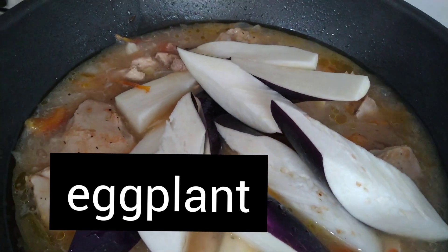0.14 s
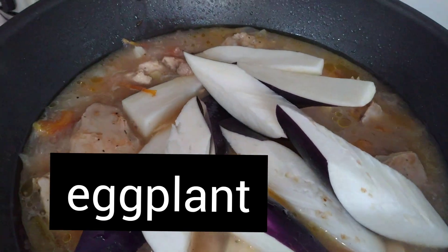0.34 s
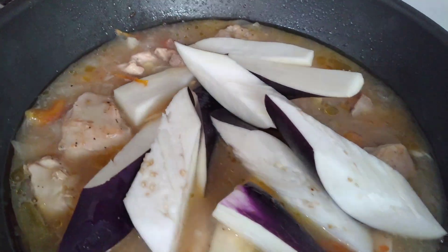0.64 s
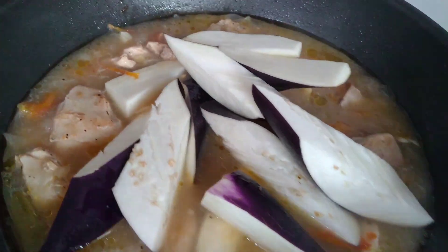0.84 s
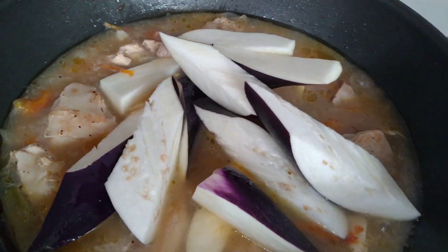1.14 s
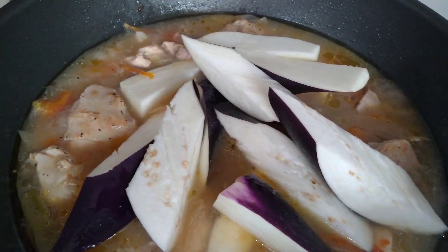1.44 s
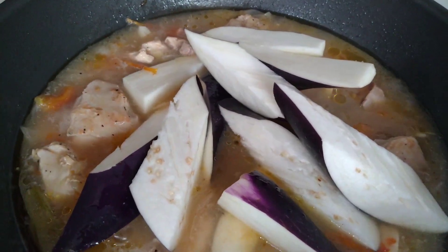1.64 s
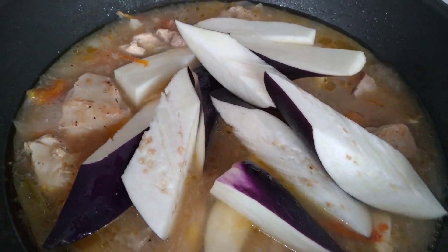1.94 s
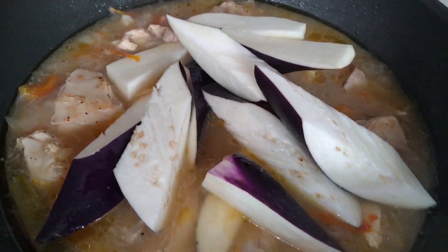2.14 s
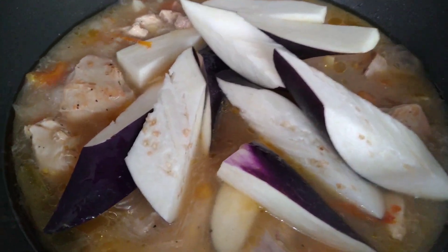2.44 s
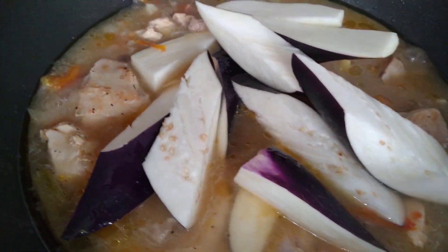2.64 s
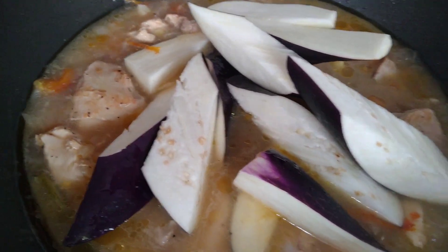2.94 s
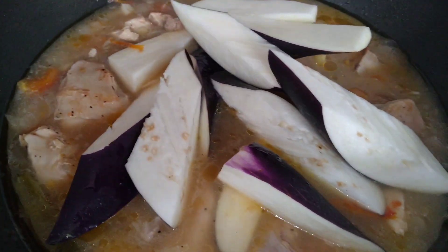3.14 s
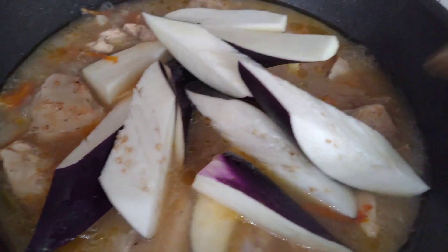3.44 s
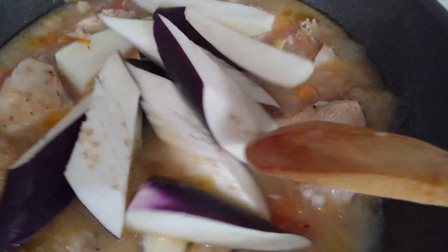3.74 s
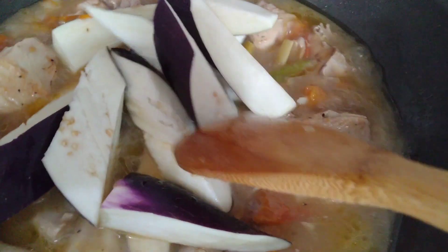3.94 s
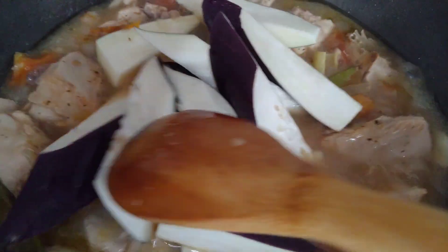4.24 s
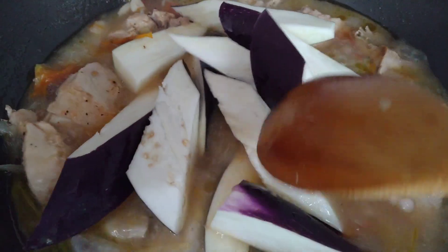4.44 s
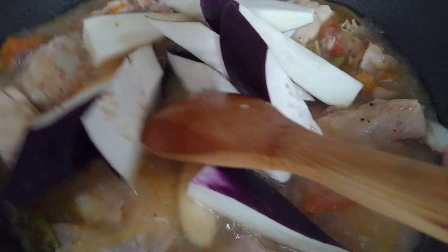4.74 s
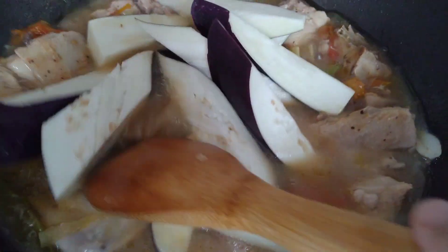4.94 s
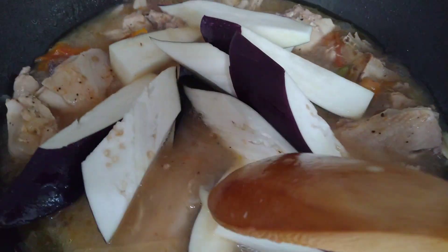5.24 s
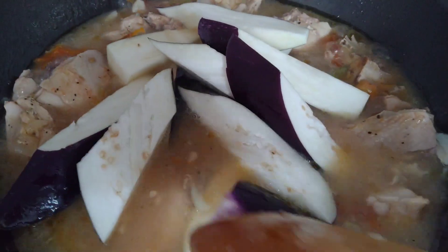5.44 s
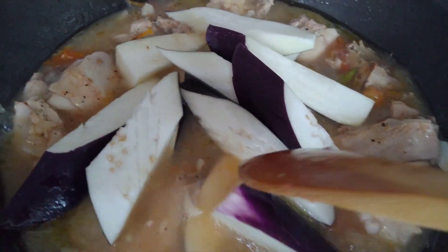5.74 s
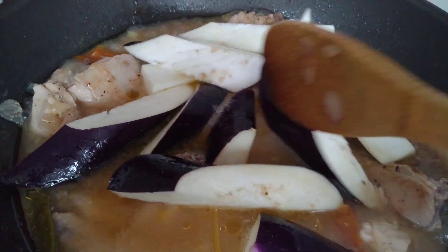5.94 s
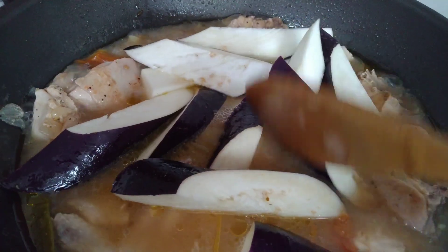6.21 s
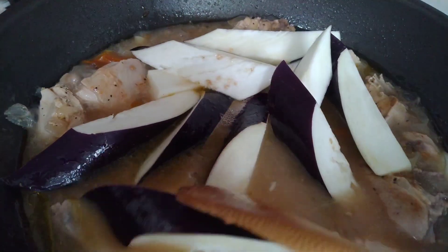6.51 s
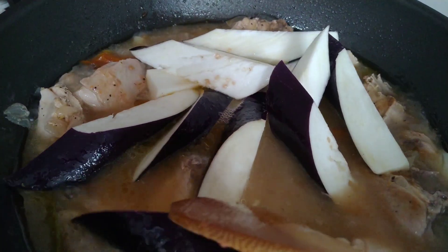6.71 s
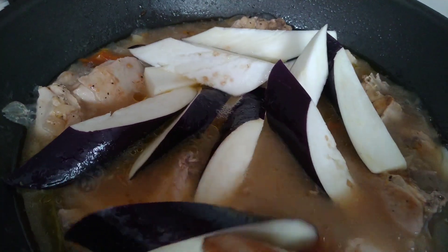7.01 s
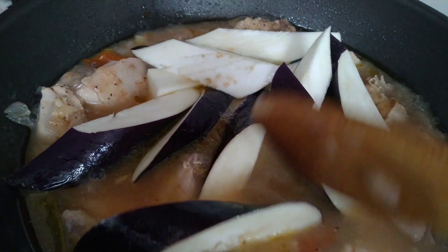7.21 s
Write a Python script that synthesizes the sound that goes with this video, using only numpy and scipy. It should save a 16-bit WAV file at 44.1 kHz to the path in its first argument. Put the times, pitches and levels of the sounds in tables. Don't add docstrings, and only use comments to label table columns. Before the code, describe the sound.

A phone held close to a simmering pan hears a low, slowly beating burner hum near 100 Hz, a soft boiling wash and thin hiss. From 0 to 1.6 s rounded bubbles pop irregularly, mostly around 1 kHz. At 1.77 s a wooden tool knocks loudly on a steel counter further off, bouncing twice within 0.06 s and ringing into a hard kitchen; a softer, duller knock follows at 2.08 s. Hand-held cutlery clinks briefly at 2.53-2.62 s. Bubbles resume, with faint wet rubs from 3.2 s. From 3.6 s a spatula stirs: short moist scrapes, higher squelchy pops, more fizz, a sharp spit at 5.06 s. At 5.76 s sound drops out for about 0.06 s, then quickly fades in. The simmer is now stronger, surging around 6.1-6.4 s with the heaviest scrape, clustered pops and crackling spits, easing slightly until 7.4 s.

```python
import sys
import numpy as np
from scipy import signal
from scipy.io import wavfile
from scipy.ndimage import uniform_filter1d

SR = 44100
rng = np.random.default_rng(int(sys.argv[2]) if len(sys.argv) > 2 else 0)


def unload_wav(signal):
    wavfile.write(
        sys.argv[1],
        SR,
        np.round(np.clip(np.atleast_2d(signal).T, -1, 1) * 32767).astype(np.int16),
    )


def field_ratio(decibels):
    return 10 ** (np.asarray(decibels, dtype=float) / 20)


N = 325017

# [t/s, level/dB]
SIMMER = [(0, -4), (1.7, -2), (2.3, -1.5), (3.2, -1.5), (4.4, -0.5), (5.7, -0.5), (5.9, 1), (6.05, 5),
          (6.2, 5.5), (6.4, 4), (6.7, 3.5), (7.37, 2.2)]


def evened(x):
    return x / np.sqrt(np.mean(x ** 2) + 1e-20)


def read(points, hz):
    f, value = np.transpose(points)
    return np.interp(np.log(hz + 1), np.log(f + 1), value)


def curves(rows):
    s, *columns = np.transpose(rows)
    return [np.interp(np.arange(N) / SR, s, c) for c in columns]


def add(mix, s, sound):
    part = mix[round(s * SR):][:len(sound)]
    part += sound[:len(part)]


def resonate(x, hz, width_hz):
    r = np.exp(-np.pi * width_hz / SR)
    return 2 * signal.lfilter([1 - r], [1, -r * np.exp(2j * np.pi * hz / SR)], x).real


def resonate_twice(x, hz, width_hz):
    return resonate(resonate(x, hz, width_hz), hz, width_hz)


def coloured(x, points):
    log_gain = np.log(field_ratio(read(points, abs(np.fft.fftfreq(4096, 1 / SR)))))
    taps = np.fft.ifft(np.exp(np.conj(signal.hilbert(log_gain)))).real[:2048]
    return signal.oaconvolve(x, taps / np.linalg.norm(taps))[:len(x)]


def wash(points, patchy_db, flicker_db):
    frames, hz = N // 256 + 5, np.fft.rfftfreq(1024, 1 / SR)
    a, b, patches = rng.standard_normal((frames, 513, 3)).T
    patches = uniform_filter1d(patches, size=14, axis=0)
    patches = evened(uniform_filter1d(patches, size=10, axis=1))
    flicker = evened(uniform_filter1d(rng.standard_normal(frames), size=5))
    level_db = read(points, hz)[:, None] + patchy_db * patches + flicker_db * flicker
    z = (a + 1j * b) * field_ratio(level_db)
    return evened(signal.istft(z, nperseg=1024, noverlap=768)[1][:N])


def hum():
    # [t/s, hum/dB, extra flutter/dB]
    load = [(0, -1, 1), (.7, -2, 4), (1.4, -1, -1), (2.1, 0, 2), (3, -1, 0), (4, 0, 2), (4.4, 0.5, -2),
            (4.75, -2, -4), (5.2, 0.5, 0), (5.7, -2.5, 6), (5.9, 3, 2), (6.3, 2, -2), (6.8, 2.5, 0),
            (7.37, 2.5, -5)]
    # [t/s, level/dB]
    near_share = [(0, -14), (1.3, -13), (2, -5), (2.5, -3), (3.6, -2.5), (5, -7), (5.6, -17), (7.37, -18)]
    hum_hz, hum_db, flutter_db, far_db = 104.47, -51.3, -10, -11
    t = np.arange(N) / SR
    near = np.exp(-2j * np.pi * 1.73 * (t - 3.416))
    far = np.exp(-2j * np.pi * 6.92 * (t - 3.461))
    beats = 1 + field_ratio(curves(near_share)[0]) * near + field_ratio(far_db) * far
    tone = np.sqrt(2) * (beats * np.exp(2j * np.pi * hum_hz * t)).imag
    flutter = evened(resonate_twice(rng.standard_normal(N), hum_hz, 40.0))
    load_db, loose_db = curves(load)
    return field_ratio(hum_db + load_db) * (tone + field_ratio(flutter_db + loose_db) * flutter)


def burner():
    # [f/Hz, width/Hz, level/dB]
    steady = [(132.2, 18.5, -63.5), (181.8, 15, -69), (300.8, 11, -71), (337.2, 10.5, -71)]
    # [t/s, length/s, f/Hz, level/dB]
    singing = [(.2, 0.23, 1864, -66.5), (.85, 0.38, 1600, -72), (2.95, .25, 1700, -73),
               (3.53, 0.23, 1850, -67.5), (5.8, 0.23, 1850, -59.5), (6.45, 0.34, 1940, -76),
               (7.12, 0.23, 1850, -64), (.05, 0.36, 2176, -71.5), (.78, 0.22, 2200, -69),
               (4.84, 0.22, 2176, -70.5), (5.08, 0.13, 2176, -67), (2.38, .14, 790, -63),
               (1., 0.28, 2900, -75), (3.75, 0.25, 2400, -77), (3, 0.23, 3000, -77),
               (4.41, 0.042, 5500, -61.5)]
    # [f/Hz, density/dB per Hz]
    body_spectrum = [(15, -60), (25, -31), (44, -29), (72, -9), (108, -5), (154, -5), (235, -12),
                     (320, -11.5), (446, -14), (510, -14.5), (1840, -22.5), (3350, -27), (4100, -43),
                     (5000, -42.5), (6500, -71), (11000, -120)]
    # [f/Hz, density/dB per Hz]
    hiss_spectrum = [(2060, -29), (3500, -2.5), (4210, -10.5), (4630, -4.5), (6700, -9), (7410, -2.5),
                     (8310, -2.5), (9200, -8), (10300, -11), (12200, -11.5), (15100, -4), (16000, -10)]
    noise = rng.standard_normal(N)
    out = hum()
    for hz, width_hz, db in steady + [(2769, 8, -88)]:
        out += field_ratio(db) * evened(resonate_twice(noise, hz, width_hz))
    for s, length_s, hz, db in singing:
        size = round(length_s * SR)
        tone = 0.77 * np.sin(2 * np.pi * hz * np.arange(size) / SR)
        add(out, s, field_ratio(db) * signal.windows.tukey(size, .6) * tone)
    vigour_db = curves(SIMMER)[0]
    body = field_ratio(-58 + vigour_db) * wash(body_spectrum, 1.93, 0.63)
    hiss = field_ratio(-71 + 0.98 * vigour_db) * wash(hiss_spectrum, 0.99, 0.76)
    return out + body + hiss


def stirring(s):
    start_s, rise_s = 3.6, .3
    return np.clip((s - start_s) / rise_s, 0, 1)


def bubble(hz, cycles, rise):
    opening_cycles = 0.52
    turns = np.arange(3000) / SR * hz
    shape = (1 - np.exp(-turns / opening_cycles)) ** 2 * np.exp(-turns / max(cycles, .3))
    pop = shape / shape.max() * np.sin(2 * np.pi * (turns + rise * turns ** 2))
    pop[118:] += 0.18 * pop[:-118].copy()
    return pop


def tick(hz, t60, width_hz):
    t, hz = np.arange(3000) / SR, min(hz, 15500)
    burst = evened(resonate_twice(rng.standard_normal(len(t)), hz, width_hz))
    decay = field_ratio(-60 * t / t60) + 0.093 * field_ratio(-60 * t / (8.0 * t60))
    return burst * (1 - np.exp(-t / 0.00014)) * decay


def bubbles():
    # [t/s, peak/dB, f/Hz, ring/cycles]
    clear = [(0.195, -35, 1180, 1.7), (0.241, -52, 1300, 2), (0.313, -46, 910, 1.1),
             (0.411, -45.5, 840, 1.5), (0.597, -46, 1340, 1.4), (0.62, -36.5, 1020, 1.2),
             (0.698, -36.5, 1410, 1.1), (0.731, -45, 960, 1.7), (0.79, -43, 1400, 2.2),
             (0.907, -39.5, 1240, 1.8), (0.972, -43, 940, 1.2), (0.984, -42, 990, 1.2),
             (1.105, -45, 910, 1.4), (1.131, -42.5, 740, 1.6), (1.2725, -39.5, 890, 0.73),
             (1.277, -40, 1210, 0.66), (1.2835, -33.5, 990, 1.8), (1.389, -37, 870, 2),
             (1.611, -37.5, 1230, 1.1), (2.5495, -32.5, 760, 0.83), (2.651, -42, 780, .9),
             (2.714, -37.5, 960, 0.83), (2.789, -42.5, 1420, 1.2), (2.875, -41.5, 920, .8),
             (2.921, -49, 800, .8), (3.163, -43, 990, 0.82), (3.1665, -35, 1300, 2),
             (3.268, -43.5, 810, 1.5), (3.322, -36, 1220, 1.4), (3.04, -47, 1050, 1.2),
             (3.397, -45, 1500, .8), (3.405, -38, 1190, 0.71), (3.442, -48, 1100, .8),
             (3.5415, -36, 1220, 1.3), (3.544, -33, 1360, 2.5), (3.59, -46, 1030, 1.5),
             (3.607, -45, 925, 1.4), (3.66, -49, 845, 1.2), (3.71, -46.5, 900, 1.5)]
    # [t/s, peak/dB, f/Hz]
    stirred_pops = [(3.889, -44.5, 564), (4.265, -41, 520), (4.426, -42.5, 665), (4.497, -43, 690),
                    (4.726, -43, 500), (4.767, -43.5, 553), (5.546, -47.5, 760), (5.818, -58, 467),
                    (6.115, -45, 630), (6.487, -53, 500), (6.555, -45, 550), (6.727, -44, 540),
                    (3.947, -48.5, 1600), (3.975, -54, 2500), (4.085, -47, 1080), (4.345, -47.5, 900),
                 (4.61, -48, 1450), (4.858, -50.5, 2450), (5.06, -52, 3050), (5.075, -48, 2000),
                 (5.35, -54, 2900), (5.46, -50, 1800), (6.49, -45, 2500), (6.61, -44, 1990),
                 (4.265, -47.5, 1070), (4.405, -43, 1560), (4.423, -45, 1880), (4.496, -43, 1460),
                 (4.709, -45, 1770), (4.726, -40, 1120), (4.77, -42, 1500), (5.098, -43, 2970),
                 (5.316, -44.5, 1410), (5.334, -41.5, 1600), (5.547, -44, 1410), (5.554, -41.5, 1380),
                 (5.628, -39, 1290), (5.65, -44, 1650), (5.899, -42, 1610), (5.909, -39, 1920),
                 (6.016, -45, 1690), (6.129, -38, 2040), (6.199, -38, 1340), (6.213, -32.5, 1680),
                 (6.302, -37.5, 1350), (6.313, -31, 1430), (6.555, -37, 1370), (6.649, -43, 1910),
                 (6.728, -43.5, 2150), (7.085, -40, 1860), (7.127, -42.5, 1140), (7.313, -41, 2500),
                 (7.327, -41.5, 1440)]
    stirred_ring_cycles, splash_db, stirred_splash_db = 1.3, -18, 8
    out = np.zeros(N)
    for s, db, hz, ring in clear + [row + (stirred_ring_cycles,) for row in stirred_pops]:
        pop = bubble(hz, ring, rise=0.0041)
        pop += 0.12 * bubble(1.56 * hz, 2.1, rise=.01)
        pop += 0.34 * bubble(0.604 * hz, 0.94, rise=0.013)
        splash = field_ratio(splash_db + stirred_splash_db * stirring(s)) * tick(hz, 0.059, width_hz=910)
        add(out, s, field_ratio(db - 3.0) * (pop + splash))
    for hz in np.geomspace(450, 1900, num=14):
        level_db = -61.0 + 1.1 * np.minimum(rng.exponential(size=N), 2)
        train = (rng.random(N) < 3.5 / SR) * field_ratio(level_db)
        out += signal.oaconvolve(train, bubble(hz, 0.95, rise=0.025))[:N]
    for hz in np.geomspace(1050, 2300, num=7):
        train = (rng.random(N) < .8 / SR) * field_ratio(-60) * stirring(np.arange(N) / SR)
        pop = bubble(hz, 1.4, rise=0.01) + 0.37 * tick(hz, 0.069, width_hz=630)
        out += signal.oaconvolve(train, pop)[:N]
    return out


def ticks():
    # [t/s, peak/dB]
    clear = [(2.282, -55), (3.864, -56), (3.918, -48.5), (3.98, -56), (4.052, -55), (4.269, -55.5),
             (4.405, -56.5), (4.63, -57), (4.763, -51), (4.935, -51), (4.968, -52), (5.058, -35),
             (5.295, -56), (5.321, -52), (5.494, -54), (5.607, -56), (5.632, -49), (5.688, -52),
             (5.705, -56), (6.046, -53), (6.217, -55), (6.346, -44), (6.38, -48), (6.428, -51),
             (6.861, -50), (7.243, -47), (7.297, -52)]
    # [t/s, peak/dB, f/Hz]
    wet_smacks = [(2.851, -58, 12700), (3.845, -51, 3000), (4.18, -59, 5200), (4.244, -58, 11200),
                  (4.338, -60, 10000), (4.87, -59, 12300), (5.512, -56, 4500), (5.907, -53, 11600),
                  (6.05, -52, 3600), (6.085, -50, 3900), (6.73, -55, 3000), (6.65, -56, 4000),
                  (6.306, -51, 9600), (6.544, -55, 11700), (6.598, -49.5, 10700), (6.805, -53, 11300),
                  (6.954, -54, 10400), (6.3674, -54, 8160), (6.3974, -52, 8200), (6.6673, -49, 8830),
                  (6.8743, -50, 8300), (6.905, -53, 8500), (6.991, -53, 8570), (7.0733, -55.5, 7580),
                  (7.2, -60, 8520)]
    rim_hz, rim_spread = 15100, 0.022
    out, fizz = np.zeros(N), np.zeros(N)
    spits = [(s, db, rim_hz * (1 + rim_spread * rng.standard_normal())) for s, db in clear]
    for s, db, hz in spits + wet_smacks:
        add(out, s, field_ratio(db - 9.5) * tick(hz, 0.038, width_hz=3800))
    for hz in np.linspace(10500, 15500, num=8):
        rate_hz = 12. * (hz / 12000) ** 2
        train = (rng.random(N) < rate_hz / SR) * field_ratio(7.8 * np.minimum(rng.exponential(size=N), 3))
        fizz += signal.oaconvolve(train, tick(hz, 0.034, width_hz=3700))[:N]
    level_db = -88.5 + 1.3 * curves(SIMMER)[0] + 7.5 * stirring(np.arange(N) / SR)
    return out + field_ratio(level_db) * evened(fizz)


def rings(modes, spread_db=0.):
    t = np.arange(8000) / SR
    out = np.zeros(len(t))
    for hz, db, t60 in modes:
        level_db = db + spread_db * rng.standard_normal()
        out += field_ratio(level_db - 60 * t / t60) * np.sin(2 * np.pi * hz * t)
    return out


def knock(blows, colour, modes):
    # [t/s, share]
    touches = [
        (0, 0.018),
        (.0006, 1.),
        (.0014, -0.12),
        (.0021, 0.58),
        (.0031, -0.3),
    ]
    dry, feed, contacts = np.zeros(N), np.zeros(N), np.zeros(8000)
    for s, share in touches:
        contacts[round(s * SR)] = share
    crack = coloured(signal.unit_impulse(len(contacts)), colour)
    chatter = coloured(contacts, colour)
    ringing = field_ratio(7.0) * rings(modes)
    for s, dry_db, room_db, dull in blows:
        dull = np.clip(dull, 0, .95)
        for mix, db, blow in ((dry, dry_db, chatter), (feed, room_db, crack)):
            hit = blow / abs(blow).max() + ringing
            soft = signal.lfilter([1], [1, -2 * dull, dull ** 2], hit)
            add(mix, s, field_ratio(db) * soft / abs(soft).max())
    return signal.sosfilt(signal.butter(2, 201, "high", fs=SR, output="sos"), [dry, feed])


def counter(s, modes):
    out, t = np.zeros(N), np.arange(SR // 2) / SR
    ringing = np.zeros(len(t))
    for hz, db, t60 in modes:
        ringing += field_ratio(db - 60 * t / t60) * np.sin(2 * np.pi * (hz * t + rng.random()))
    add(out, s, (1 - np.exp(-t / 0.0079)) * ringing)
    return out


def kitchen(x, damping):
    # [f/Hz, t60/s]
    decay = [(250, 0.39), (660, 0.47), (1740, 0.37), (4590, 0.4), (8000, 0.34), (16000, 0.35)]
    taps = np.zeros(SR)
    count = (SR - 61) // 10
    at = np.arange(60, SR - 10, 10) + rng.integers(0, 10, count)
    taps[at] = rng.choice([-1., 1.], count)
    hz, t, z = signal.stft(taps, SR, nperseg=256)
    t60 = read(decay, hz) / (1 + damping * np.minimum(hz / 4000, 1))
    tail = signal.istft(z * field_ratio(-60 * t / t60[:, None]), SR, nperseg=256)[1]
    tail = tail * (1 - .5 * np.exp(-np.arange(len(tail)) / SR / 0.23))
    return signal.oaconvolve(x, tail / np.linalg.norm(tail))[:N]


def cutlery():
    # [t/s, level/dB, rattle/s, treble/dB per octave]
    clinks = [
        (2.53, -42.5, 0.013, -8),
        (2.539, -46, 0.014, -3),
        (2.573, -48.5, 0.013, -9),
        (2.619, -52, 0.0039, -14),
        (2.623, -40.5, 0.012, 1),
    ]
    # [f/Hz, level/dB, t60/s]
    steel_modes = [(1910, -2, .003), (2800, 1, 0.0062), (3680, -3, 0.0045), (5330, -11, .009),
                   (6560, -6, 0.01), (7700, -8.5, 0.0092), (8200, -11, .008), (9350, -12, .008),
                   (10900, -20, .012), (12670, -17, .012), (14600, -14, .008)]
    out, t = np.zeros(N), np.arange(3000) / SR
    for s, db, rattle_s, treble_db in clinks:
        chatter = rng.standard_normal(len(t)) * np.exp(-t / max(rattle_s, .001))
        tilted = [(hz, mode_db + treble_db * max(np.log2(hz / 6500), 0), t60)
                  for hz, mode_db, t60 in steel_modes]
        body = rings(tilted, spread_db=0.5)
        body[:2] += 3.5, 1.5
        add(out, s, field_ratio(db) * signal.oaconvolve(chatter / np.linalg.norm(chatter), body))
    return out


def spatula():
    # [t/s, length/s, level/dB, bright share/dB]
    strokes = [(3.227, 0.1, -62.5, -6), (3.418, 0.064, -63, -5), (3.643, 0.1, -61, -11),
               (3.836, 0.032, -62, -15), (3.949, .06, -61.5, -9), (4.392, 0.095, -54, -3.5),
               (4.725, 0.085, -67, -33), (4.26, .04, -63, -10), (4.49, 0.029, -72, -10),
               (5.057, 0.023, -61, 3), (5.087, 0.057, -61, -4), (5.313, 0.08, -69, -9),
               (5.616, 0.046, -58.5, -23), (5.717, 0.038, -57.5, -30), (6.147, 0.12, -47.5, -12.5),
               (6.552, 0.16, -52, -9), (7.106, 0.077, -56, -31), (7.29, 0.078, -58.5, -9)]
    out = np.zeros(N)
    clumps = 5.8 * uniform_filter1d(rng.standard_normal((2, N)), size=60)
    grains = rng.standard_normal((2, N)) * field_ratio(3.3 * clumps)
    dull = evened(resonate_twice(grains[0], 1800, 2000))
    bright = 1.7 * resonate(grains[1], 5450, 200)
    bright += 3.1 * resonate(grains[1], 8040, 1500)
    bright += 0.89 * resonate(grains[1], 15000, 5000)
    bright = evened(bright)
    for s, length_s, db, bright_db in strokes:
        at, size = round(s * SR), round(length_s * SR)
        span, u = slice(at, at + size), np.arange(size) / size
        shape = field_ratio(db) * 2.2 * u ** (8 * length_s) * (1 - u) ** 1.38
        out[span] += shape * (dull[span] + field_ratio(bright_db) * bright[span])
    return out


def scene():
    # [t/s, dry/dB, room/dB, dullness 0-1]
    blows_a = [
        (1.765, -10.5, -6.5, 0.03),
        (1.784, -23, -17, 0.79),
        (1.8195, -14, -12.5, 0.47),
    ]
    blows_b = [
        (2.077, -19.5, -14.5, .02),
        (2.093, -25, -24.5, 0.83),
        (2.131, -29, -31, 0.78),
    ]
    # [f/Hz, density/dB per Hz]
    colour_a = [(150, -63), (250, -15.5), (325, -22), (393, -20), (566, -9.5), (607, -6.5), (1010, 4.5),
                (1530, -6.5), (2240, 2.5), (2570, -7), (3710, -11.5), (5440, -23), (8260, -21.5),
                (8700, -33.5), (16000, -50)]
    colour_b = [(150, -55.5), (250, -13), (308, -19), (325, -6.5), (429, -1.5), (538, -17), (816, 0),
                (1060, -3), (1640, -17.5), (1790, -15), (2360, -18), (2960, -18.5), (4410, -33.5),
                (9010, -27.5), (16000, -42)]
    # [f/Hz, level/dB, t60/s]
    modes_a = [(407, -34.5, 0.075), (1020, -47, .03), (1810, -33.5, 0.045), (2234, -25, 0.06),
               (2283, -34, 0.18), (7100, -36.5, 0.039), (7540, -34, 0.024), (8100, -34, 0.045),
               (8900, -41.5, .02), (6170, -42, 0.013), (9700, -47, .03), (11500, -53, .035),
               (13200, -48, .015), (14800, -51, .02)]
    modes_b = [(421, -30.5, 0.07), (690, -17.5, 0.031), (820, -35, 0.045), (870, -28, 0.039),
               (1030, -47, 0.037), (1300, -32, .02), (2090, -35, 0.013), (2930, -26, 0.022),
               (3170, -29.5, 0.018), (8300, -32, 0.008), (11370, -50, 0.015), (14000, -44, .004)]
    # [f/Hz, level/dB, t60/s]
    counter_a = [(672, -40.5, 0.51), (780, -40, 0.32), (990, -43, .4), (1020, -42.5, 0.36),
                 (1260, -46, .35), (1445, -45, .4), (1795, -43.5, .35), (2100, -41.5, .4),
                 (2166, -43.5, .35), (2205, -38, .45), (2320, -40, .36), (2348, -44, .35), (8240, -51, .3)]
    counter_b = [(158, -41, 0.14), (350, -49, .17), (440, -52, .3), (680, -42, 0.18), (820, -43, .35),
                 (934, -40, .3), (1050, -46, .2), (1300, -48, .15), (2090, -55, .1), (2966, -50, .25),
                 (3058, -58, .22)]
    near = bubbles() + ticks() + spatula()
    dry_a, feed_a = knock(blows_a, colour_a, modes_a)
    dry_b, feed_b = knock(blows_b, colour_b, modes_b)
    steel = cutlery()
    room = kitchen(feed_a + field_ratio(-11.5) * near, 0.0077) + kitchen(feed_b + field_ratio(-7.0) * steel, 0.68)
    tops = counter(blows_a[0][0], counter_a) + counter(blows_b[0][0], counter_b)
    return (burner() + near + steel + dry_a + dry_b + room + tops)[None]


def band_limit(x):
    return signal.sosfilt(signal.butter(12, 16670, fs=SR, output="sos"), x)


def record(dry):
    # [t/s, level/dB]
    cut_level = [
        (5.7555, 4.5),
        (5.7565, -90),
        (5.812, -92),
        (5.816, -17),
        (5.84, -5.5),
        (5.87, -2.5),
        (5.9, -1),
    ]
    band = signal.sosfilt(signal.butter(2, 105.3, "high", fs=SR, output="sos"), dry)
    lowpass = signal.firwin(401, 15800, window=("kaiser", 7), fs=SR)
    band = signal.oaconvolve(band, lowpass[None], "same")
    port_dip = .6 * resonate(band, 7900, 130)
    port_peak = .45 * resonate(band, 8110, 220)
    mix = (band - port_dip + port_peak) * field_ratio(curves(cut_level)[0])
    return band_limit(mix)


dry = scene()
out = record(dry)
unload_wav(out)
```